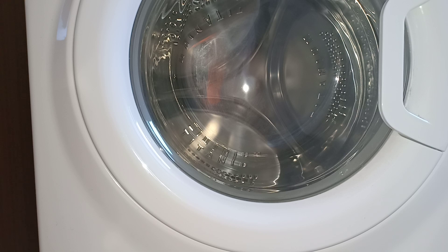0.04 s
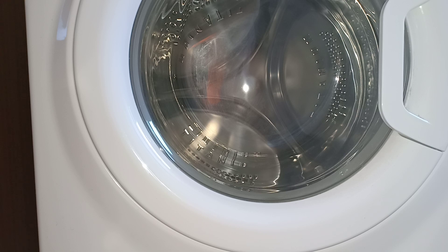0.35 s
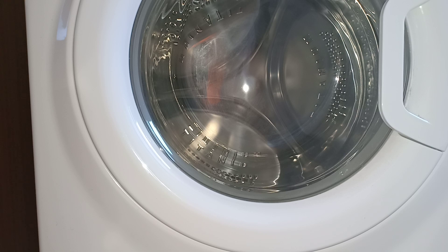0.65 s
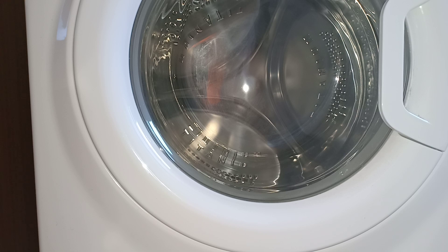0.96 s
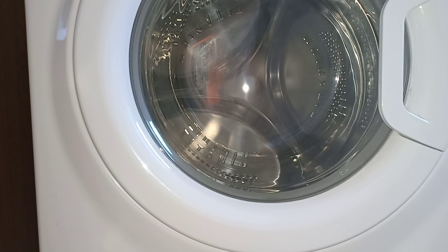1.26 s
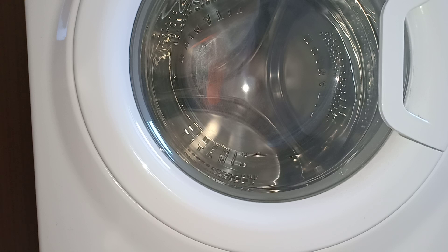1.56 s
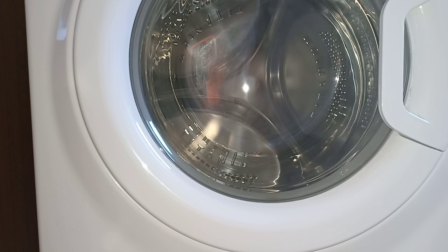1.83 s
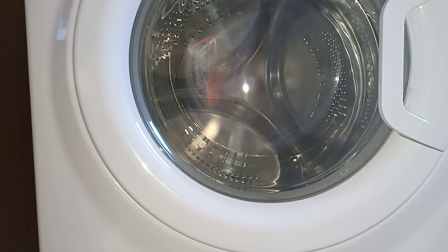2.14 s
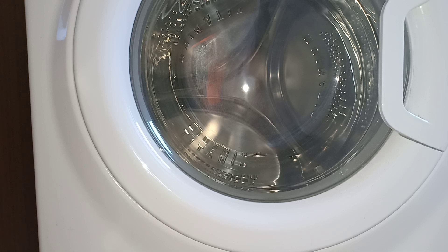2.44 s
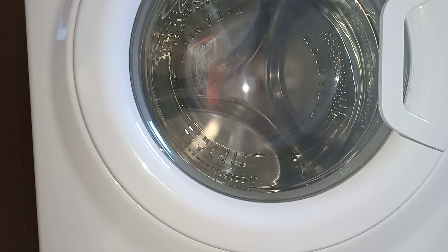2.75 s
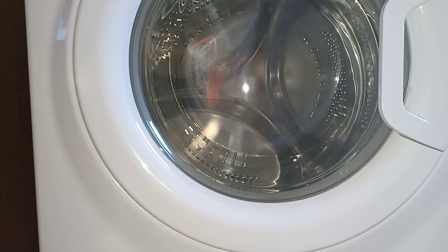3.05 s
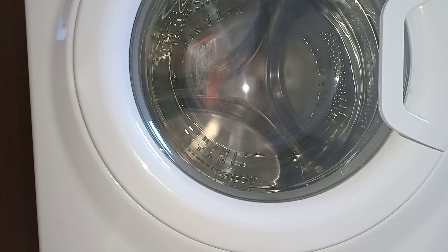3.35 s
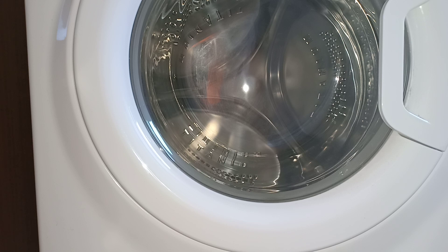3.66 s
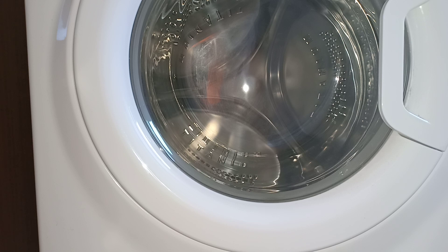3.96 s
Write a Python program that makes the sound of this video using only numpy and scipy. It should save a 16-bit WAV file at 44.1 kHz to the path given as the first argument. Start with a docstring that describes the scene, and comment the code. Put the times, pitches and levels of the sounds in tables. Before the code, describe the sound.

A washing machine hums faintly before its pump clunks on and loudly churns water.

```python
"""In a small room, a front-loading washing machine hums faintly, then its drain pump starts with a clunk.
The rotor, turning in step with the mains, drones. The impeller (the pump's paddle wheel) churns water
and air, spray hisses, droplets tick, and a rattle comes twice in every three turns.
The pump rings the cabinet and the room, and runs down just before the end."""
import sys
import numpy as np
from scipy import signal
from scipy.fft import rfft, irfft
from scipy.io import wavfile
from scipy.ndimage import uniform_filter1d

SR = 44100
rng = np.random.default_rng(int(sys.argv[2]) if len(sys.argv) > 2 else 0)


def put_to_file(sound):
    """Save the sound as 16-bit audio at rate SR, in the file named by the first command-line argument."""
    columns = np.atleast_2d(sound).T  # one column per channel
    safe = np.clip(columns, -1, 1)
    whole_steps = np.round(safe * 32767)
    wavfile.write(sys.argv[1], SR, whole_steps.astype(np.int16))


N = 176400
BIN_HZ = np.arange(N // 2 + 1) * SR / N
SHAFT_HZ, CYCLE_TURNS = 50, 3  # the pump's pattern repeats every three turns
START_S, CLUNK_S, STOP_S, RUN_DOWN_S = 2.152, 2.204, 3.897, 0.11


def undb(db):
    """Turn decibels into a gain."""
    return 10 ** (np.asarray(db) / 20)


def unit(x):
    """Scale to an average (rms) size of 1."""
    return x / np.sqrt(np.mean(x ** 2))


def wander(rate):
    """A smooth random wobble of size 1 that takes about `rate` steps a second."""
    k = int(SR / rate)
    steps = np.repeat(rng.standard_normal(N // k + 1), k)
    return unit(uniform_filter1d(uniform_filter1d(steps, k), k)[:N])


def spectrum(points):
    """Join (f/Hz, level/dB) points into a curve over all frequencies."""
    hz, db = np.array(points).T
    return np.interp(np.log(BIN_HZ + 1), np.log(hz), db)


def colour(x, db):
    """Filter by a curve in dB, so that ringing follows each hit and never comes before it."""
    cepstrum = irfft(np.log(undb(db)), N)
    cepstrum[1:N // 2] *= 2
    cepstrum[N // 2 + 1:] = 0
    return irfft(rfft(x) * np.exp(rfft(cepstrum)), N)


def stereo(mid, side):
    """Make left and right, scaled so that the middle has size 1."""
    return np.array([mid + side, mid - side]) / np.sqrt(np.mean(mid ** 2))


def pan(x, left_db):
    """Set the left side's level against the right's."""
    return x * undb(np.array([[left_db], [-left_db]]) / 2)


def from_right(x, lag_s=.00045):
    """Sound from the right reaches the left ear a little later."""
    return np.array([np.roll(x[0], round(lag_s * SR)), x[1]])


def clicks(rate, spread_db):
    """Random hits of uneven size, about `rate` a second."""
    size = rng.choice([-1, 1], N) * undb(spread_db * np.clip(rng.standard_normal(N), -2, 2))
    return unit((rng.random(N) < rate / SR) * size)


# Tone of the room's background noise: f/Hz, relative level/dB
AIR_TONE = [(25, -18), (41, -12), (53, -10), (61, -1.5), (75, -18.5), (96, -5), (121, -7), (151, 2),
            (176, -10.5), (214, -7.5), (275, -14), (385, -7.5), (430, -12), (520, -10), (850, -13.5),
            (1100, -16.5), (1400, -20.5), (1800, -17.5), (2600, -18), (3000, -23.5), (3400, -29),
            (5000, -32.5), (7500, -38), (11000, -38.5), (15500, -37.5)]
# How wide that noise sounds: f/Hz, side level against the middle/dB
AIR_WIDTH = [(60, -14.5), (150, -5.5), (380, -2), (700, -0.5), (1300, 0), (15000, 0)]
def room_noise(level_db=-62.5):
    """Soft, steady noise fills the room."""
    mid, side = rng.standard_normal((2, N))
    tone = spectrum(AIR_TONE)
    air = stereo(colour(mid, tone), colour(side, tone + spectrum(AIR_WIDTH)))
    return air * undb(level_db + 0.25 * wander(10))


# Notes of the machine's hum: f/Hz, level/dB
HUM_NOTES = [(58, -77), (97, -73.5), (149, -81), (387, -86), (479, -81.5)]
def hum(t):
    """The machine hums faintly, each note wavering in loudness and pitch."""
    out = 0
    for hz, db in HUM_NOTES:
        gain = np.sqrt(2) * undb(db) * (1 + 0.2 * wander(8.66))
        out += gain * np.sin(2 * np.pi * hz * t + 0.68 * np.pi * wander(9.6))
    return out


def whine(t, peak_s=0.59, spread_s=0.15, hz=498, fall_hz_per_s=103, level_db=-70):
    """A faint, slightly falling whine swells and fades in the idle machine."""
    age = t - peak_s
    phase = 2 * np.pi * (hz * age - fall_hz_per_s * age ** 2 / 2) + .5 * wander(27.3)
    return undb(level_db + 2 * wander(38)) * np.exp(-.5 * (age / spread_s) ** 2) * np.sin(phase)


def run_down(t):
    """A gain that dies away once the pump stops."""
    return np.exp(-np.maximum(t - STOP_S, 0) / RUN_DOWN_S)


# Notes of the rotor's drone: vibrations per three-turn cycle, level/dB
DRONE_NOTES = [(4, -65.5), (5, -52), (6, -50.5), (7, -51.5), (8, -41.5), (9, -55.5), (10, -49.5), (11, -45),
               (13, -42), (23, -48.5), (39, -49.5), (43, -49), (48, -50), (57, -49)]
def drone(t, rise_s=0.25, thump_at_s=2.243, thump_top_hz=140):
    """The rotor shakes the cabinet; the lowest notes line up in one soft thump each cycle."""
    out = 0
    for k, db in DRONE_NOTES:
        hz = round(k) * SHAFT_HZ / CYCLE_TURNS
        offset = rng.random() * (hz > thump_top_hz)
        phase = 2 * np.pi * (hz * (t - thump_at_s) + offset) + 0.25 * k / 8 * wander(5.1)
        out += np.sqrt(2) * undb(db + 0.6 * wander(9)) * np.sin(phase)
    fade_in = np.clip((t - START_S) / rise_s, 0, 1)
    return pan(out * fade_in * run_down(t), left_db=-3.5)


def room_echo(t, fade_s=0.17, echo_db=-1.5):
    """The walls add a short echo to the direct sound; gives spectra for the middle and the sides."""
    tails = rng.standard_normal((2, N)) * undb(-60 * t / fade_s)
    tails /= np.linalg.norm(tails, axis=1, keepdims=True)
    paths = (t == 0) + undb(echo_db) * tails[0], tails[1]
    smooth = lambda x: uniform_filter1d(x, size=100)
    # even out the tone, then the balance between left and right
    mid, side = rfft([colour(p, -10 * np.log10(smooth(np.abs(rfft(p)) ** 2))) for p in paths])
    return np.array([mid, side - mid * smooth((side * mid.conj()).real)])


# Pitches the cabinet rings at: f/Hz, width/Hz, middle boost/dB, side boost/dB
CABINET_PEAKS = [(157, 50, 1, 2), (269, 28, -1, 11.5), (369, 50, 7, 0), (425, 21, 7.5, 6),
                 (469.4, 18, 10, 2.5), (647, 24.5, 9, 4), (713, 32.5, 6, 4.5), (792.7, 49, 7.5, -3),
                 (936, 40, 7, 5), (1098, 12, 5, 14.5), (1166, 24, 7, 9.5), (1272, 59, -1, 15),
                 (1598, 45, 7, -13.5), (1734, 42, -1.5, 7.5), (1933, 62, 5, 8), (2043, 30, 8, 9),
                 (2110, 25, -4, 5), (2202, 42, 4.5, -3), (2370, 27, 3.5, 9)]
# How wide the machine sounds: f/Hz, side level against the middle/dB
CABINET_WIDTH = [(60, -16.5), (150, -11), (300, 0), (700, 2.5), (1300, 3), (2300, -3.5), (4400, 1.5),
                 (15000, 4)]
def cabinet(force, tone_table, walls):
    """A force rings the cabinet and reaches the listener through the room."""
    boost = sum(np.outer([m, s], np.exp(-2 * ((BIN_HZ - hz) / width) ** 2))
                for hz, width, m, s in CABINET_PEAKS)
    mid_db, side_db = spectrum(tone_table) + boost
    mid, side = irfft(walls * rfft(force), N)
    return stereo(colour(mid, mid_db), colour(side, side_db + spectrum(CABINET_WIDTH)))


def twitch(t, chatter, at_s=2.175, top_hz=442, panel_hz=390):
    """The rotor twitches before it catches: a dull shudder that sets off one panel note."""
    rise = np.sqrt(np.clip((t - at_s) / (CLUNK_S - at_s), 0, 1)) * (t < CLUNK_S)
    shudder = signal.sosfilt(signal.butter(5, top_hz, fs=SR, output="sos"), chatter)
    note = np.sin(2 * np.pi * panel_hz * (t - CLUNK_S))
    return rise * (undb(-11) * shudder + undb(-42) * note)


# Tone of the clunk: f/Hz, relative level/dB
CLUNK_TONE = [(30, -34), (80, -21), (140, 5.5), (250, -5), (330, -4), (600, -1.5), (900, -10.5),
              (1400, -28), (2000, -16.5), (2600, -12), (3300, -32), (5300, -28), (7000, -45), (8500, -46),
              (14000, -59), (16000, -67)]
def clunk(t, walls, rise_s=0.0042, hold_s=0.034, decay_s=0.055, level_db=-28):
    """The rotor twitches, then chatters against its stop."""
    age = np.maximum(t - CLUNK_S, 0)
    blow = np.minimum(age / rise_s, 1) * np.exp(-np.maximum(age - hold_s, 0) / decay_s)
    chatter = undb(level_db) * cabinet(clicks(3300, 2), CLUNK_TONE, walls)
    return twitch(t, chatter) + blow * chatter


# Notes of the struck panels: f/Hz, level/dB, time to fade by 60 dB/s, pitch bend at the start/Hz
PANEL_NOTES = [(128.4, -31, 0.27, 2), (150.4, -20.5, 0.22, 12.5), (305.4, -26, 0.78, 60),
               (310, -33, 0.6, 50), (378, -26, 0.34, 13), (4280, -43.5, 0.23, -10)]
def panel_ring(t, rise_s=.02, bend_s=.04):
    """The panels ring on after the clunk, each note sliding to its resting pitch."""
    age = np.maximum(t - CLUNK_S, 0)
    slide = bend_s * (1 - np.exp(-age / bend_s))
    notes = sum(undb(db - 60 * age / fade_s) * np.sin(2 * np.pi * (hz * age + bend * slide))
                for hz, db, fade_s, bend in PANEL_NOTES)
    return notes * np.minimum(age / rise_s, 1)


def bursts(t, between, peak_s=2.213, spread_s=0.007):
    """A gain that rises to 1 twice each cycle and sinks toward `between`."""
    gap = CYCLE_TURNS / SHAFT_HZ / 2
    from_peak = (t - peak_s + gap / 2) % gap - gap / 2
    return between + (1 - between) * np.exp(-.5 * (from_peak / spread_s) ** 2)


def impeller_blows(repeat_gain=0.81):
    """The impeller hits the water: some blows repeat every cycle, the rest are random."""
    pattern = rfft(clicks(900, 2.9)[:round(CYCLE_TURNS / SHAFT_HZ * SR)])
    pattern /= np.abs(pattern)
    pattern[[round(k) for k, _ in DRONE_NOTES]] = 0  # leave gaps for the drone's notes
    repeating = unit(np.resize(irfft(pattern), N)) * undb(0.5 * wander(90))
    return repeat_gain * repeating + clicks(1200, 3.7)


# Tone of the rumble: f/Hz, relative level/dB
RUMBLE_TONE = [(30, -35), (80, -27.5), (135, -4), (170, -2), (205, -8), (240, -5), (285, -13), (400, -3),
               (520, -10), (700, -12), (1200, -30), (16000, -75)]
def rumble(t, blows, walls, rise_s=.36):
    """A low rumble builds as the pump takes up water."""
    gain = undb(-34.5) * np.sqrt(np.clip((t - START_S) / rise_s, 0, 1)) * run_down(t)
    return gain * cabinet(blows * bursts(t, between=0.54), RUMBLE_TONE, walls)


# Tone of the churning: f/Hz, relative level/dB
CHURN_TONE = [(30, -43), (200, -17.5), (420, -12.5), (560, -6), (850, -4.5), (1150, -13), (1450, -24.5),
              (2200, -30), (16000, -81.5)]
def churn(t, blows, walls):
    """The impeller's blows churn water and air."""
    return cabinet(blows * bursts(t, between=0.59), CHURN_TONE, walls)


# Tone of the rattle: f/Hz, relative level/dB
RATTLE_TONE = [(30, -48), (900, -29.5), (1400, -15), (1620, 0.5), (2000, 3), (2550, -5.5), (2900, -9),
               (3600, -20.5), (16000, -76)]
def rattle(t, walls):
    """Bursts of small, uneven hits rattle the cabinet."""
    return from_right(cabinet(clicks(3200, 3.5) * bursts(t, between=0.29), RATTLE_TONE, walls))


# Tone of the spray: f/Hz, relative level/dB
HISS_TONE = [(30, -42), (2200, -7.5), (3300, 0), (5200, 0), (6600, -7), (7600, -19), (10000, -29.5),
             (11600, -23), (12800, -29), (13300, -19.5), (13900, -19), (15300, -34.5)]
def hiss(t, walls):
    """Spray makes so many tiny hits that they blur into a flickering hiss."""
    spray = clicks(8000, 1.6) * bursts(t, between=0.49) * undb(wander(25.0))
    return from_right(cabinet(spray, HISS_TONE, walls))


# How hard the pump works: t/s, churn level/dB, rattle level/dB, hiss level/dB
PUMP_LEVELS = [(2.21, -42, -37.5, -44), (2.3, -41.5, -47.5, -56), (2.44, -39, -44.5, -54.5),
               (2.48, -33.5, -36, -55), (2.58, -35, -41, -59), (2.628, -33.5, -36.5, -52.5),
               (2.664, -41.5, -43.5, -59.5), (2.7, -36, -39, -55.5), (2.88, -32.5, -38, -56),
               (3.05, -33.5, -38, -56), (3.27, -32.5, -38.5, -53.5), (3.57, -32.5, -35.5, -53),
               (3.77, -30.5, -35.5, -51.5), (3.86, -32.5, -37, -54), (3.93, -38.5, -42.5, -63),
               (3.96, -47, -48.5, -64), (4.0, -57, -54, -64)]
def pump(t, walls, rise_s=0.023):
    """From the clunk on, the pump rumbles while its churn, rattle and hiss rise and fall."""
    blows = impeller_blows()
    out = rumble(t, blows, walls)
    layers = churn(t, blows, walls), rattle(t, walls), hiss(t, walls)
    times, *levels = np.array(PUMP_LEVELS).T
    for layer, db in zip(layers, levels):
        out += layer * undb(np.interp(t, times, db))
    return out * np.clip((t - CLUNK_S) / rise_s, 0, 1)


# Moments when one pitch sings out: t/s, spread/s, f/Hz, level/dB
DRONE_SWELLS = [(2.41, 0.033, 133, -37.5), (2.46, 0.019, 378, -34.5), (2.545, 0.026, 425, -34),
                (2.64, 0.021, 386.3, -36.5), (2.73, 0.038, 379.5, -35.5), (2.86, 0.052, 803.5, -36.5),
                (2.885, 0.018, 374, -32.5), (2.92, 0.052, 953, -40), (3.07, 0.034, 380, -34.5),
                (3.31, 0.025, 366.7, -37.5), (3.65, 0.12, 792, -35.5), (3.68, 0.088, 644.6, -39.5),
                (3.7, 0.079, 926, -42)]
def swells(t):
    """Single pitches of the drone swell and fade, wavering a little."""
    out = 0
    for at, spread, hz, db in DRONE_SWELLS:
        phase = 2 * np.pi * hz * t + 0.31 * wander(20)
        out += np.sqrt(2) * undb(db) * np.exp(-.5 * ((t - at) / spread) ** 2) * np.sin(phase)
    return out


# Ticks of droplets: t/s, f/Hz, width/Hz, level/dB, decay/s
DROPLETS = [(2.755, 5250, 402, -50, 0.017), (3.437, 12200, 2620, -59, .014)]
def droplets(t):
    """Each droplet ticks: a narrow band of noise that dies away fast."""
    out = 0
    for at, hz, width, db, decay in DROPLETS:
        band = np.exp(-2 * ((BIN_HZ - hz) / width) ** 2)
        ring = unit(irfft(rfft(rng.standard_normal((2, N))) * band, N))
        out += ring * undb(db) * (t > at) * np.exp(-np.abs(t - at) / decay)
    return out


# Tone of the rasp: f/Hz, relative level/dB
RASP_TONE = [(30, -51), (1700, -23.5), (2000, 2.5), (2300, 4), (2650, 1), (3000, -10), (4000, -27.5),
             (16000, -74)]
def rasp(t, walls, from_s=3.103, to_s=3.83, fade_s=0.092, level_db=-40):
    """Bright bursts of rasping join in while the pump works hardest."""
    hits = clicks(3200, 1.4) * bursts(t, between=0.27)
    fade = np.clip(np.minimum(t - from_s, to_s - t) / fade_s, 0, 1)
    return from_right(cabinet(hits, RASP_TONE, walls)) * undb(level_db) * fade


def scene():
    """The machine idles, then its pump starts, runs and stops."""
    t = np.arange(N) / SR
    walls = room_echo(t)
    idle = pan(room_noise() + hum(t), left_db=-.8)
    start = clunk(t, walls) + panel_ring(t)
    running = drone(t) + pump(t, walls) + rasp(t, walls) + droplets(t)
    return idle + whine(t) + start + running + swells(t)


def record(dry):
    """Cut the treble above 15500 Hz and add a tiny constant offset."""
    return signal.sosfilt(signal.ellip(10, .2, 80, 15500, fs=SR, output="sos"), dry) + .001


dry = scene()
out = record(dry)
put_to_file(out)
```